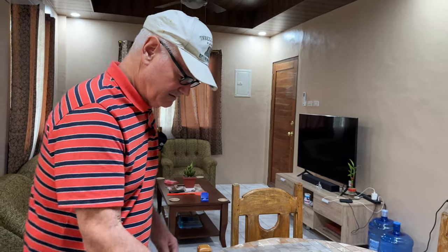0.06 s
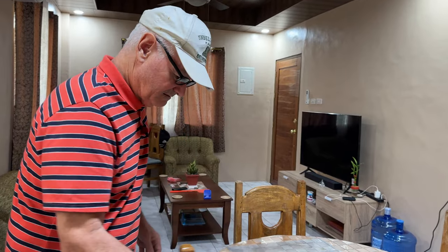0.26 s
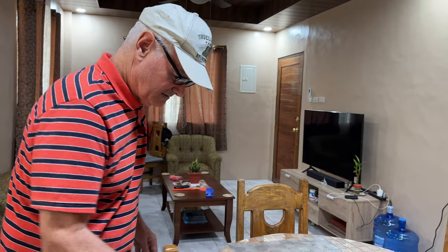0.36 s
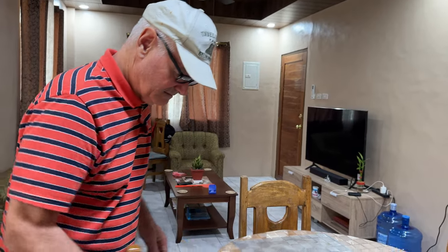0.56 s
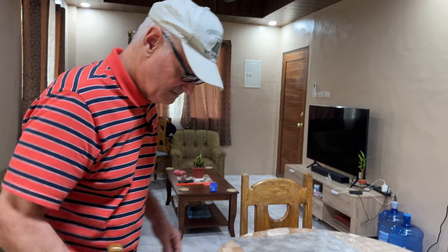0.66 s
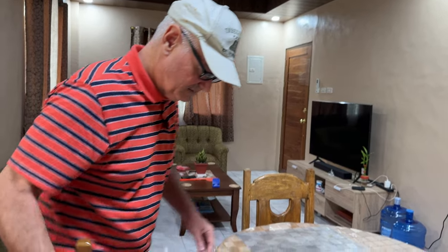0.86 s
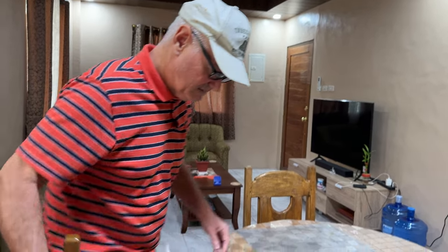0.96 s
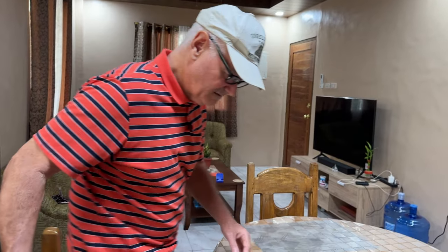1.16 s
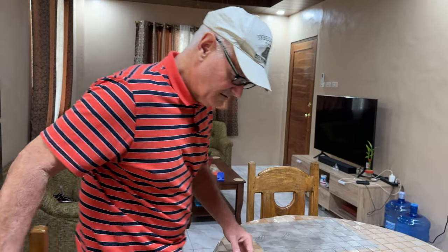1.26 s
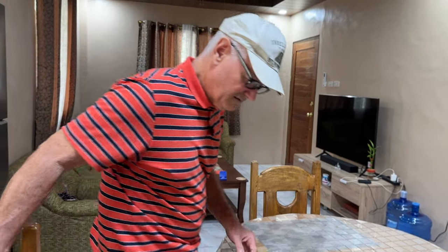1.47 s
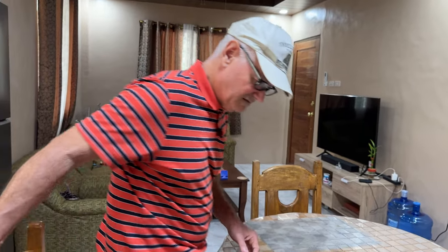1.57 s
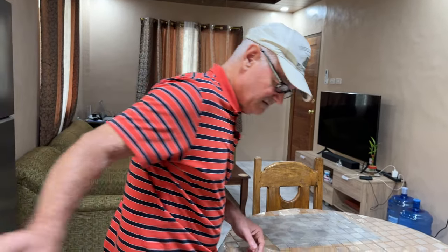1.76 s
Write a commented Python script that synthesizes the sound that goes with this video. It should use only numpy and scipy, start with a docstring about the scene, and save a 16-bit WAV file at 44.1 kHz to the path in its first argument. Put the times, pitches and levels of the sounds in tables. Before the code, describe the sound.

A wooden chair scrapes over a tiled floor in several uneven shoves, close by in a hard-walled living room. The legs rasp and fall into a low judder, with a dull rumble, light ticks and faint clothes rustle.

```python
"""A wooden chair scrapes back over a tiled floor in several shoves, close by in a hard-walled living room.
Its legs stick and slip unevenly, rasping on the tile and ringing the frame; one leg locks into a low
judder, strongest late in the pull. A dull rumble, a few light ticks and a faint rustle of clothes
go with it, over quiet room noise."""
import sys
import numpy as np
from scipy import signal
from scipy.fft import rfft, irfft, next_fast_len
from scipy.io import wavfile
from scipy.ndimage import map_coordinates

SR = 44100
rng = np.random.default_rng(int(sys.argv[2]) if len(sys.argv) > 2 else 0)


def pcm_store(signal):
    """Save signal as 16-bit PCM."""
    levels = np.round(np.clip(np.atleast_2d(signal), -1, 1) * 32767)
    wavfile.write(sys.argv[1], SR, levels.astype(np.int16).T)


N = 79380
TIME_S = np.arange(N) / SR


# How hard the legs scrape, shove by shove: time_s, level_db
SCRAPE_LEVEL = [(0, -46.5), (.165, -49.5), (.18, -36.5), (.238, -35), (.248, -25.5), (.3, -31), (.335, -31),
                (.4, -40.5), (.425, -25.5), (.45, -42), (.49, -28.5), (.5, -22.5), (.55, -19),
                (.635, -22.5), (.666, -15), (.71, -33), (.78, -31.5), (.82, -33), (.88, -46), (.925, -26),
                (.945, -21), (.975, -26.5), (1.02, -33.5), (1.085, -20), (1.13, -34.5), (1.18, -22.5),
                (1.26, -29.5), (1.3, -29), (1.345, -23), (1.392, -21.5), (1.41, -41.5), (1.45, -30.5),
                (1.52, -50.5), (1.8, -70)]
# Rasp of the feet on tile: frequency_hz, gain_db
RASP_EQ = [(60, -42), (250, -3), (500, 1), (750, 1.5), (1100, 0.5), (1500, -3), (2300, -10), (3000, -23),
           (5000, -36.5), (8000, -44.5), (15000, -61)]
def scrape():
    """Slipping feet rasp on the tile and ring the frame, which the judder shakes too."""
    friction = stick_slip() * fader(SCRAPE_LEVEL) + jolts()
    wood = filtered(amp(0.5) * friction + amp(-10) * shake(), frame_resonance)
    rasp = filtered(friction, lambda hz: unit(amp(along(RASP_EQ, hz))))
    return pan(scatter(wood + amp(-3.5) * rasp), left_db=0.9)


def stick_slip(legs=2, slip_hz=149.7, spread_db=2.5, grit_s=0.0024, grit_share=0.56):
    """Legs catch and let go in uneven pulses, each trailing grit."""
    pulses = np.zeros(N)
    for _ in range(legs):
        cycles = np.cumsum(slip_hz * np.exp(0.25 * wobble(14))) / SR
        jitter, strength = rng.standard_normal((1024, 2)).T
        onsets = np.searchsorted(cycles, np.arange(len(jitter)) + 0.3 * jitter)
        pulses += np.bincount(onsets, amp(spread_db * strength), N + 1)[:N]
    trails = signal.lfilter([1], [1, -np.exp(-1 / (grit_s * SR))], pulses)
    grit = unit(trails * rng.standard_normal(N))
    return np.sqrt(1 - grit_share) * unit(pulses - pulses.mean()) + np.sqrt(grit_share) * grit


# Accents in the scrape: start_s, level_db
JOLT_HITS = [(.178, -28.5), (.247, -11), (.266, -35), (.501, -15.5), (.546, -16.5), (.667, -16.5),
             (.909, -24), (.965, -11), (1.251, -15), (1.391, -9.5)]
def jolts(decay_s=0.0022, grit_db=-6.5):
    """A foot breaks loose with one hard slip and a short burst of grit."""
    force = np.zeros(N)
    for start_s, level_db in JOLT_HITS:
        burst = np.exp(-abs(TIME_S - start_s) / decay_s) * (TIME_S >= start_s)
        force += amp(level_db + grit_db) * rng.standard_normal(N) * burst
        force[round(start_s * SR)] += amp(level_db) * np.sqrt(decay_s * SR)
    return force


# Body of the chair: pitch_hz, width_hz, gain_db
FRAME_MODES = [(125, 38, -10), (205, 55, 1.5), (248, 48, 0), (346.1, 27, 6), (405.5, 18.1, 9.5),
               (452.5, 25.7, 5.5), (583.7, 40, 0), (603, 18.2, 4), (690, 75, -2), (802, 36, 2.5),
               (841, 39, -7.5), (1212, 75, -24.5), (1296, 150, -16.5), (2320, 54, -27)]
def frame_resonance(hz):
    """The wooden frame rings in modes of alternating polarity; power gain 1."""
    response = 0
    for k, (pitch_hz, width_hz, gain_db) in enumerate(FRAME_MODES):
        damping = 1j * hz * width_hz
        response += (-1) ** k * amp(gain_db) * damping / (pitch_hz ** 2 - hz ** 2 + damping)
    return response / np.sqrt(np.mean(abs(response) ** 2))


# Biting edge of the hardest shove: frequency_hz, gain_db
GRIND_EQ = [(400, -26), (700, 1.5), (870, 9), (1000, 0), (2100, 1.5), (2260, 10), (2450, -7.5),
            (3400, -9.5), (6000, -25), (8000, -31.5), (15000, -44)]
def grind(expansion=2.49):
    """Pressed hard, the feet bite into the tile and the scrape turns brighter."""
    bite = stick_slip() * fader(SCRAPE_LEVEL) ** expansion
    edge = amp(-40) * unit(eq(bite, GRIND_EQ))
    return pan(scatter(edge), left_db=0.9)


# Swells of the juddering leg: time_s, level_db
JUDDER_LEVEL = [(0, -39), (.08, -51), (.23, -47), (.285, -19.5), (.32, -41.5), (.5, -36), (.555, -19),
                (.626, -35.5), (.692, -18.5), (.785, -47.5), (.83, -16.5), (.89, -30.5), (.968, -12.5),
                (1.026, -32), (1.06, -13.5), (1.094, -38), (1.118, -18.5), (1.18, -10.5), (1.228, -24.5),
                (1.256, -8), (1.29, -20), (1.322, -12), (1.39, -21), (1.452, -15), (1.475, -22.5),
                (1.56, -42), (1.8, -75)]
# Its nearly pure tone: harmonic_number, gain_db
JUDDER_HARMONICS = [(1, 5.5), (2, -27), (3, -25.5)]
def judder(pitch_hz=258, waver=0.014, flutter_db=0.8):
    """One leg swings at its own resonance, kept going by the friction."""
    phase = 2 * np.pi * np.cumsum(pitch_hz * (1 + waver * wobble(70))) / SR
    swing = unit(sum(amp(gain_db) * np.sin(number * phase) for number, gain_db in JUDDER_HARMONICS))
    flutter = amp(flutter_db * wobble(90))
    return pan(swing * fader(JUDDER_LEVEL) * flutter, left_db=0.45)


# What the judder passes to the frame: frequency_hz, gain_db
SHAKE_EQ = [(60, -30), (140, -14), (195, 5), (225, 0), (260, -9), (400, -3), (590, 0), (750, -10),
            (1500, -10), (3000, -25)]
def shake():
    """Rough pulses drive the frame as the judder swells."""
    return eq(stick_slip() * fader(JUDDER_LEVEL), SHAKE_EQ)


# Swell of the rumble: time_s, level_db
RUMBLE_LEVEL = [(0, -43), (.08, -48), (.15, -35), (.28, -32.5), (.4, -38), (.55, -33.5), (.7, -33),
                (.79, -36.5), (.95, -33), (1.15, -37), (1.33, -28), (1.48, -32.5), (1.6, -49), (1.8, -65)]
# Its dull weight: frequency_hz, gain_db
RUMBLE_EQ = [(20, -33), (42, -31), (66, -3), (85, -2.5), (105, -12), (130, 4.5), (190, -0.5), (240, 4.5),
             (400, -16), (1500, -88)]
def rumble(trim_db=3.5):
    """The whole chair shudders as it travels."""
    return noise(RUMBLE_EQ) * fader(RUMBLE_LEVEL) * amp(trim_db)


# Light ticks: start_s, level_db
TICK_HITS = [(0.055, -48), (0.159, -43), (0.248, -49.5), (0.5013, -48), (0.541, -42.5), (0.6404, -47),
             (0.8133, -52.5), (1.099, -48), (1.1633, -42), (1.2116, -44.5), (1.3359, -45.5)]
# Their bright snap: frequency_hz, gain_db
TICK_EQ = [(200, -48), (2000, 8.5), (4000, 1), (5900, 2.5), (8000, -7.5), (11000, -5.5), (15500, -1)]
def ticks(t60_s=0.062, trim_db=2):
    """Joints and feet make short contacts that die at once."""
    envelope = np.zeros(N)
    for start_s, level_db in TICK_HITS:
        envelope += amp(level_db - 60 * abs(TIME_S - start_s) / t60_s) * (TIME_S >= start_s)
    return pan(noise(TICK_EQ) * envelope * amp(trim_db), left_db=-0.5)


# Movement of the clothes: time_s, level_db
RUSTLE_LEVEL = [(0, -67), (.14, -63.5), (.18, -54), (.36, -63.5), (1.05, -59.5), (1.17, -52), (1.25, -47),
                (1.3, -54.5), (1.37, -49.5), (1.48, -72), (1.8, -106.5)]
# Hiss of the fabric: frequency_hz, gain_db
CLOTH_EQ = [(200, -47), (2000, 10), (4000, -1), (5800, -1.5), (8000, -11), (10500, -10.5), (15500, -39)]
def rustle(trim_db=1.5):
    """Clothes brush in soft swells of hiss, off to the left."""
    return pan(noise(CLOTH_EQ) * fader(RUSTLE_LEVEL) * amp(trim_db), left_db=5.5)


def scatter(x, t60_s=0.031, crossover_hz=707):
    """Highs glance off floor, table and seat, differently for each ear; the bass comes straight."""
    fade = amp(-60 * np.arange(SR // 12) / SR / t60_s)
    paths = lambda: rng.standard_normal((2, len(fade))) * fade / np.linalg.norm(fade)
    high_share = lambda hz: 1 / (1 + (crossover_hz / (hz + 1)) ** 6)
    highs = filtered(travelling(x, paths, positions=14), lambda hz: np.sqrt(high_share(hz)))
    lows = filtered(x, lambda hz: np.sqrt(1 - high_share(hz)))
    return highs + lows


# Reverb return: frequency_hz, gain_db
REVERB_EQ = [(80, -17), (250, -1), (500, 0), (1500, -1.5), (5000, -0.5), (12000, 0)]
def room(x):
    """The hard walls answer with a reverb that is thin in the bass."""
    return eq(travelling(x, room_tail, positions=7), REVERB_EQ)


# Reverb time: frequency_hz, t60_s
REVERB_DECAY = [(100, .4), (500, .55), (2000, .58), (6000, .48), (14000, .28)]
def room_tail():
    """A diffuse stereo tail; each frequency dies at its own speed."""
    hz, t, spectrum = signal.stft(rng.standard_normal((2, SR // 2)), SR, nperseg=256)
    decay = amp(-60 * t / along(REVERB_DECAY, hz)[:, None])
    decay /= np.linalg.norm(decay, axis=1, keepdims=True)
    _, tail = signal.istft(spectrum * decay, SR, nperseg=256)
    return tail / np.linalg.norm(tail[0])


# Dark bed of room noise: frequency_hz, gain_db
AIR_EQ = [(20, -14), (80, -9), (250, -4), (600, -10.5), (1500, -18.5), (3000, -30.5), (8000, -42),
          (15500, -49)]
def room_tone(level_db=-46.5):
    """Steady, quiet noise, part centred and part wide."""
    return amp(level_db) * unit(noise(AIR_EQ) + 0.8 * noise(AIR_EQ, channels=2))


def travelling(x, response, positions):
    """Cross-fade through fresh stereo responses as the chair moves."""
    centres_s = np.linspace(0, N / SR, positions)
    fades = [np.sqrt(np.clip(1 - abs(TIME_S - s) / centres_s[1], 0, 1)) for s in centres_s]
    return sum(signal.fftconvolve(np.atleast_2d(x * fade), response(), axes=1)[:, :N] for fade in fades)


def amp(db):
    """Decibels to gain."""
    return 10 ** (np.asarray(db) / 20)


def unit(x):
    """Scale to rms 1."""
    return x / np.sqrt(np.mean(x ** 2) + 1e-20)


def along(curve, hz):
    """Read (frequency_hz, value) rows on a log axis."""
    frequency_hz, values = np.transpose(curve)
    return np.interp(np.log(hz + 1), np.log(frequency_hz + 1), values)


def fader(rows):
    """A gain per sample from (time_s, level_db) rows."""
    return amp(np.interp(TIME_S, *np.transpose(rows)))


def wobble(rate_hz):
    """A smooth random curve, rate_hz knots a second."""
    return map_coordinates(rng.standard_normal(2048), [TIME_S * rate_hz + 2], mode="mirror")


def filtered(x, response):
    """Apply a complex frequency response."""
    size = next_fast_len(N + SR // 2)
    return irfft(rfft(x, size) * response(np.fft.rfftfreq(size, 1 / SR)), size)[..., :N]


def eq(x, curve):
    """Equalise by (frequency_hz, gain_db) rows."""
    return filtered(x, lambda hz: amp(along(curve, hz)))


def noise(curve, channels=1):
    """Coloured noise of rms 1."""
    return unit(eq(rng.standard_normal((channels, N)), curve))


def pan(x, left_db):
    """Boost the left and cut the right by left_db."""
    return x * amp([[left_db], [-left_db]])


def scene():
    """Chair and clothes over room tone, the judder drier than the rest."""
    close = scrape() + grind() + rumble() + rustle() + ticks()
    leg = judder()
    air = room_tone()
    return close + leg + room(close + amp(-10) * leg) + air


def record(dry, cutoff_hz=15800):
    """A brick-wall low-pass takes off the very top."""
    return filtered(dry, lambda hz: hz < cutoff_hz)


dry = scene()
out = record(dry)
pcm_store(out)
```